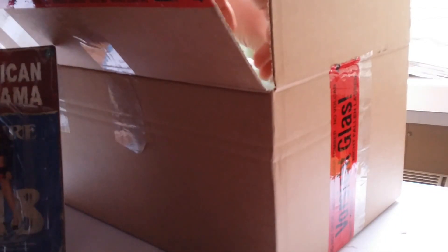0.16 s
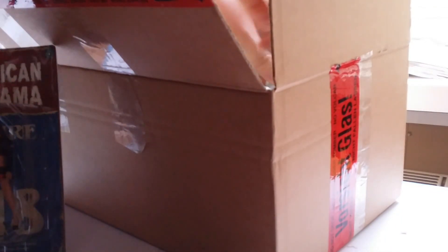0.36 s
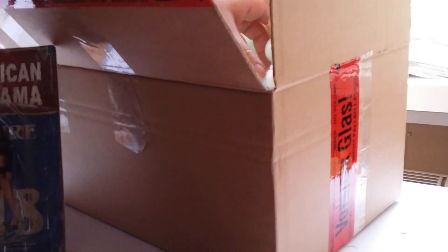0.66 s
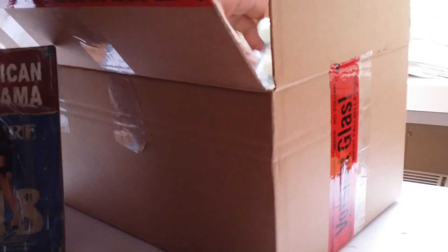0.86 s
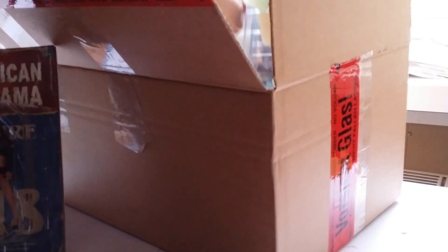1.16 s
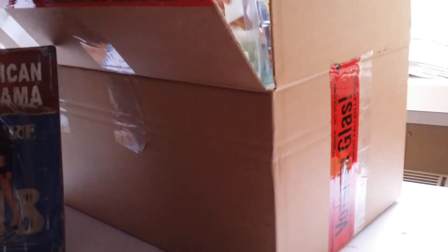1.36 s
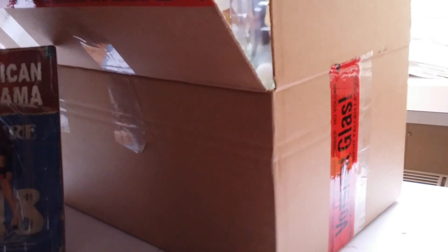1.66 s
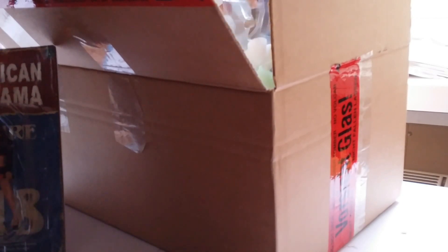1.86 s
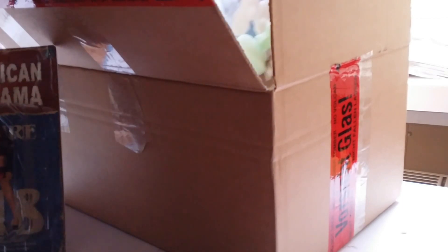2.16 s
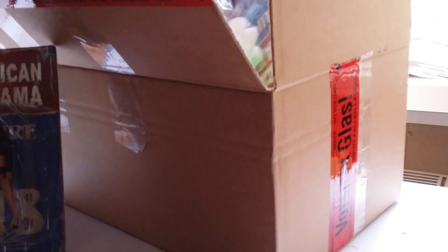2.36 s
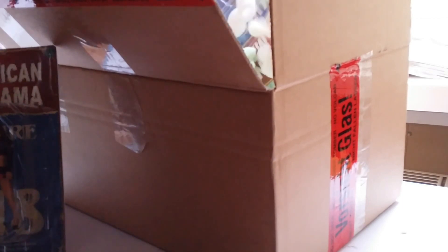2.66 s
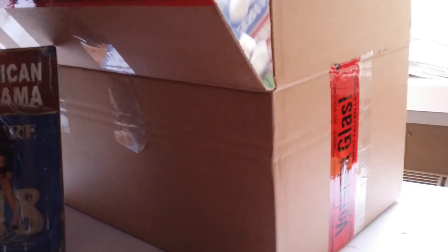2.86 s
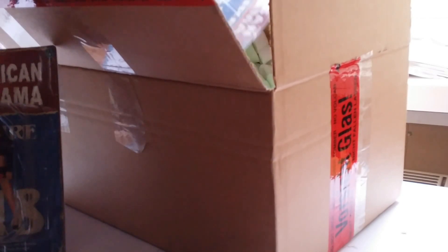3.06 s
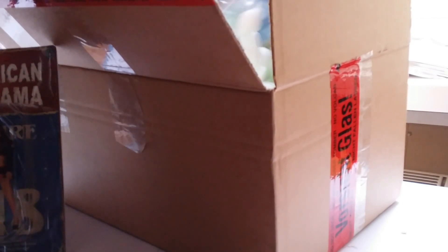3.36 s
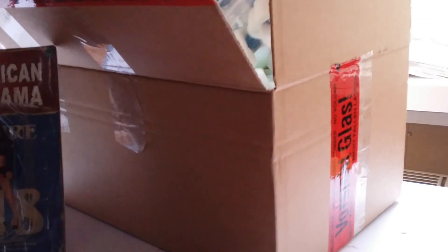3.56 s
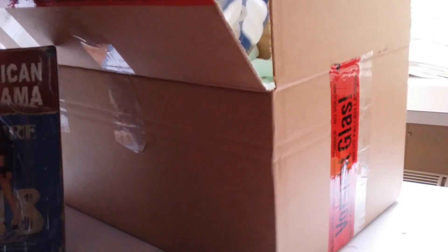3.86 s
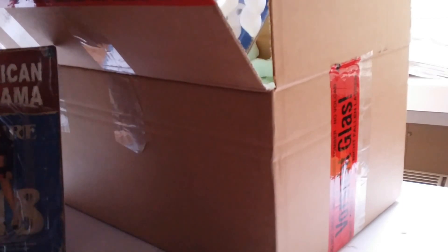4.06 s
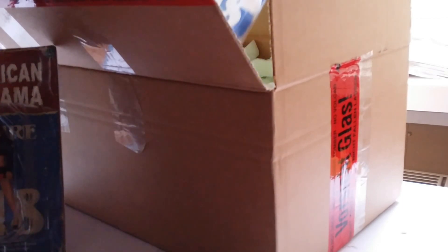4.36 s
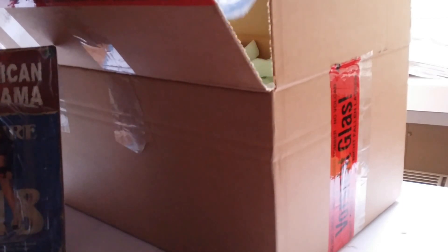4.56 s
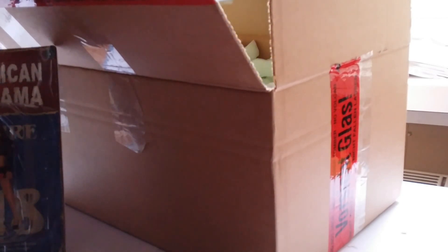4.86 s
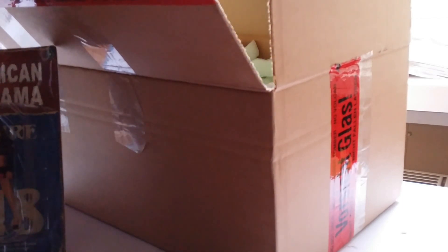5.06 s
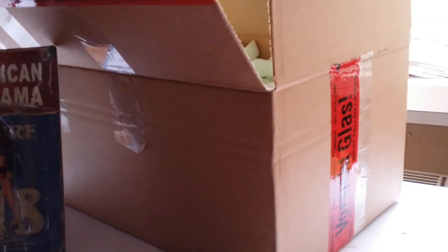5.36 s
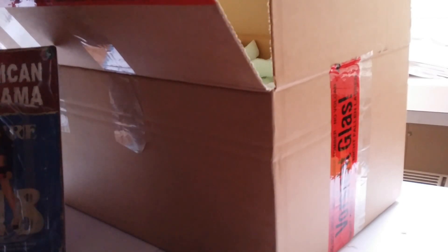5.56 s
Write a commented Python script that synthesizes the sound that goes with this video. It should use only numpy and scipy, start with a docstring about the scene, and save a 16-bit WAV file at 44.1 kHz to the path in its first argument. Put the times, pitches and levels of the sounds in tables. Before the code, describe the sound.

Light foam packing pieces slide and tumble in a cardboard box, in short irregular bursts. Bright granular rustling mixes with dull boxy bumps, little woody ticks and occasional crisp snaps. Activity is busiest in the first two seconds, continues in softer separate strokes, then fades to an almost silent lull with stray ticks. The sound finishes with a very short, loud plastic crinkle close to the microphone in the dry indoor space.

```python
"""A hand digs through foam packing peanuts in a cardboard box and draws out a plastic-wrapped object, in a small room.
From the start each stroke makes foam slide in dense tiny slips, heard as filtered random grains, while flicked
pieces ring as decaying sines. Pieces jostle, drop and knock, exciting the damped modes of the cardboard;
noise bursts give the few squeaks and the snaps of foam and wrapping. The digging then thins to a lull.
At the end the wrapping crinkles sharply close to the microphone: dense cracks and a few loud folds."""
import sys
import numpy as np
from scipy import signal
from scipy.fft import rfft, irfft
from scipy.io import wavfile
from scipy.ndimage import uniform_filter1d

SR = 44100
rng = np.random.default_rng(int(sys.argv[2]) if len(sys.argv) > 2 else 0)


def file_out(sig):
    """Save sig as 16-bit WAV at sys.argv[1]."""
    # one column per channel
    cols = np.atleast_2d(sig).T
    # limit, then scale
    lim = np.clip(cols, -1, 1)
    pcm = np.round(lim * 32767).astype(np.int16)
    wavfile.write(sys.argv[1], SR, pcm)


N = 252252
TIME = np.arange(N) / SR
HIT_TIME = np.arange(SR // 4) / SR

# All table levels are nominal: each source may trim them, and room and microphone ports follow.
# Strokes of the hand through the heap: (start [s], rise [s], hold [s], sliding level [dB],
# top treble setting relative to sliding [dB], jostling level [dB])
STROKES = [(0.01, 0.037, 0.0092, -52.5, -11, -55.5), (0.126, 0.027, 0.069, -51.5, -8, -54.5),
           (0.294, 0.072, .025, -47.5, -10, -50), (0.396, .04, 0.017, -44.5, -12, -43.5),
           (0.51, 0.054, 0.23, -52, -6.5, -52.5), (0.736, 0.035, 0.033, -49, -16, -48.5),
           (0.819, 0.14, 0.03, -36, -6.5, -46.5), (1.015, 0.057, .08, -43.5, -7.5, -51.5),
           (1.168, 0.035, 0.042, -47, -9, -49.5), (1.274, 0.032, 0.22, -53, -11, -55.5),
           (1.528, 0.066, 0.042, -51, -6.5, -53), (1.697, 0.042, 0.019, -59.5, -11, -56),
           (1.814, 0.023, 0.02, -55, -10, -47.5), (1.891, 0.027, 0.038, -48, -8.5, -52.5),
           (2.007, 0.018, 0.014, -57, -8, -56.5), (2.228, 0.026, 0.029, -57.5, -9.5, -61.5),
           (2.365, 0.019, .13, -51.5, -10.5, -54.5), (2.549, 0.019, 0.062, -54, -12.5, -57.5),
           (2.702, 0.037, 0.065, -61.5, -4.5, -59), (2.863, 0.018, .03, -57, -7.5, -59),
           (2.955, .04, 0.15, -61, -6.5, -56), (3.071, 0.024, 0.044, -57, -8.5, -52),
           (3.212, 0.031, 0.018, -65, -6, -72), (3.292, 0.022, .11, -46, -14.5, -50),
           (3.457, 0.034, 0.025, -51.5, -10.5, -49), (3.61, 0.041, 0.17, -62, -11, -63),
           (3.752, 0.055, 0.14, -52.5, -9, -57), (3.944, .02, 0.045, -59, -12, -69),
           (4.113, .1, 0.088, -63, -3, -71.5), (4.35, .03, 0.037, -73.5, -12, -69.5),
           (4.672, .02, .03, -75.5, -1, -71.5), (4.878, 0.021, 0.017, -72, -5, -79),
           (4.98, 0.018, .01, -78, 0, -85), (5.09, .015, .025, -67, -17, -64),
           (5.544, 0.042, 0.14, -66.5, -5.5, -69.5)]
# Faint creep of the disturbed heap: (time [s], sliding level [dB], jostling level [dB])
HEAP_CREEP = [(0, -68, -71.5), (3.6, -71.5, -68.5), (4.6, -76, -74), (5.1, -77, -71.5), (5.3, -80.5, -89)]
# Share of the box opening filled by the arm: (time [s], share [0-1])
ARM_SHARE = [(0.3, 0.1), (0.9, 0.6), (1.15, 0.72), (1.6, 0.06), (2.2, 0.46)]
# Spectrum of foam sliding on foam: (frequency [Hz], relative level [dB per Hz])
SLIDE_SPECTRUM = [(100, -38), (500, -3.5), (1000, -11), (1600, -11.5), (2200, -8.5), (3100, -1),
                  (4200, -4.5), (5600, -3), (7000, 1.5), (8500, -0.5), (10000, -10.5), (13000, -15),
                  (15500, -17.5)]
# Spectrum of jostling pieces: (frequency [Hz], relative level [dB per Hz])
JOSTLE_SPECTRUM = [(30, -31), (60, -10.5), (90, -2.5), (130, -4.5), (200, 1.5), (290, 3), (400, -3.5),
                   (560, -4.5), (800, -10), (1300, -14.5), (2500, -18), (6000, -64.5)]
# Blows on the cardboard: (time [s], level [dB], centre of the tone [Hz], crack level [dB])
KNOCKS = [(0.18, -44, 450, -65), (0.245, -49.5, 540, -68), (0.376, -41, 505, -44), (0.46, -31, 563, -55.5),
          (0.92, -44, 964, -62), (1.213, -46, 725, -58), (1.243, -43, 360, -51), (1.356, -40.5, 415, -44.5),
          (1.409, -50, 605, -81), (1.469, -44.5, 765, -46), (1.765, -52.5, 590, -60),
          (1.822, -49.5, 382, -68), (1.864, -49.5, 476, -49), (1.874, -48, 1010, -45.5),
          (2.395, -45, 324, -53.5), (2.503, -48, 610, -48.5), (2.573, -49.5, 616, -54.5),
          (2.649, -38, 544, -50.5), (2.657, -39.5, 806, -51), (2.703, -48.5, 493, -51.5),
          (2.788, -59, 584, -59), (2.968, -45.5, 402, -68), (2.998, -50, 276, -72),
          (3.116, -41, 530, -47.5), (3.416, -46, 306, -70), (3.474, -35, 490, -48), (3.481, -38, 460, -61),
          (3.741, -50, 443, -72), (3.774, -44.5, 570, -54.5), (3.798, -47.5, 380, -52.5),
          (3.992, -48, 360, -73), (4.234, -59, 527, -71), (4.435, -58, 355, -79), (4.699, -61, 690, -69),
          (5.098, -54, 940, -56.5)]
# Damped modes of the cardboard walls: (frequency [Hz], relative level [dB], t60 [s])
BOX_MODES = [(181, 3.5, 0.079), (278.4, -2.5, 0.13), (329, -2, 0.048), (408.5, 0, 0.074), (548, 1.5, 0.054),
             (658, -7, 0.008), (787, -6, 0.062), (1170, 0.5, 0.014), (1203, 3.5, 0.026), (1402, -5.5, 0.09),
             (1726, 5, 0.029), (2280, -11, 0.015)]
# Spectrum of the crack of crushed foam: (frequency [Hz], relative level [dB])
CRACK_SPECTRUM = [(300, -12), (900, 2), (1500, -4.5), (2700, 1), (4000, -5.5), (7000, -8), (10000, -12),
                  (15500, -25)]
# Shifts of the whole box: (time [s], level [dB], pitch [Hz], t60 [s])
THUMPS = [(0.983, -50, 85, 0.15), (1.874, -53.5, 101.4, 0.22), (2.747, -49.5, 80, 0.13),
          (3.099, -31.5, 198, 0.014), (3.102, -55, 89.5, 0.18), (3.479, -48, 91, 0.046)]
# Snaps of foam and wrapping: (time [s], level [dB], t60 [s])
SNAPS = [(0.049, -49, 0.027), (0.127, -52, 0.036), (0.216, -50, 0.03), (1.358, -53, 0.017),
         (1.627, -49, 0.038), (1.894, -39.5, 0.048), (1.9, -40.5, 0.072), (1.916, -54, 0.03),
         (2.032, -45.5, 0.05), (2.383, -63, 0.03), (2.618, -54, 0.03), (2.84, -49, 0.02),
         (2.88, -46.5, 0.033), (3.177, -51, 0.035), (3.307, -49, 0.024), (3.532, -50, 0.03),
         (3.746, -54.5, 0.03), (3.975, -45, 0.033), (4.031, -54, 0.03), (4.088, -61, 0.028),
         (4.437, -56, 0.026), (5.1, -52, 0.008)]
# Spectrum of a snap: (frequency [Hz], relative level [dB per Hz])
SNAP_SPECTRUM = [(200, -20), (1200, -10), (3000, -9), (5500, -4.5), (7800, 6), (10000, -7), (15500, -12.5)]
# Foam sticking and slipping: (time [s], length [s], pitch [Hz], bandwidth [Hz], level [dB])
SQUEAKS = [(0.433, 0.013, 3350, 200, -52), (0.969, 0.074, 2060, 150, -43), (1.108, 0.017, 2220, 350, -46),
           (1.893, 0.04, 7800, 800, -39), (1.897, 0.024, 5600, 600, -45.5)]
# Single peanuts that drop and tick: (time [s], pitch [Hz], level [dB])
DROPS = [(1.468, 884, -43.5), (1.562, 2140, -50), (2.503, 1375, -48.5), (2.658, 1390, -44),
         (2.702, 2700, -53), (3.194, 1290, -59), (3.739, 1340, -56), (3.773, 1840, -58), (4.411, 910, -63),
         (4.436, 640, -68), (4.699, 1700, -65), (4.848, 1420, -66), (5.057, 1300, -64), (5.112, 890, -59),
         (5.142, 710, -66)]
# Creasing of the wrapping near the microphone: (time [s], level [dB])
CREASE = [(5.678, -54), (5.682, -45), (5.698, -42), (5.702, -32.7), (5.72, -31.7)]
# Folds of the wrapping that flip over: (time [s], level [dB])
FOLDS = [(5.705, -24.5), (5.7078, -23.5), (5.7143, -31)]
# Spectrum of the wrapping: (frequency [Hz], relative level [dB per Hz])
WRAP_SPECTRUM = [(100, -28), (330, -7.5), (850, -23), (1450, -4.5), (2000, -7.5), (2400, -15), (3000, -2),
                 (4000, -8.5), (5400, -1), (7800, 4.5), (9300, -2), (11000, -3.5), (13400, 0), (15500, -6)]
# Spectrum of room rumble and microphone hiss: (frequency [Hz], relative level [dB per Hz])
HISS_SPECTRUM = [(25, -9), (55, -5), (100, -4.5), (160, -3), (230, -10), (330, -14), (440, -14.5),
                 (700, -29), (1100, -20), (2000, -28), (3600, -27.5), (5200, -21.5), (7400, -12),
                 (9800, -30.5), (15500, -30.5)]
# Gain of the side signal: (frequency [Hz], gain [dB])
SIDE_GAIN = [(40, -4), (130, -12.5), (270, -16.5), (520, -9), (1000, -5), (2000, -4), (4000, 0),
             (16000, 0.5)]
# Response of the left microphone port: (frequency [Hz], gain [dB])
LEFT_PORT = [(60, -1.9), (330, 2.1), (700, 0), (2500, 1), (4500, 1.2), (6600, 1), (7500, -1), (8600, -5),
             (10500, 1.3), (15000, 0)]
# Response of the right microphone port: (frequency [Hz], gain [dB])
RIGHT_PORT = [(60, 1), (330, 1.95), (700, 3), (2500, 1), (4500, 0.5), (6600, -5), (7500, -3), (8600, 0),
              (10500, 3), (15000, -1)]

# Growth of a stroke as it takes hold, and its steady fall once the hand stops
SWELL_DB, SLIDE_REST_DB_PER_S, JOSTLE_REST_DB_PER_S = 15.5, 131.5, 182
CREEP_TOP_DB = -9.5  # treble setting of the creep, relative to its sliding
REBOUND_S, REBOUND_DB = 0.009, -12.5


def undb(db):
    """Decibel law: level to amplitude ratio."""
    return 10 ** (np.asarray(db) / 20)


def curve(rows):
    """Linear interpolation in time of each column of a table."""
    times, *columns = np.transpose(rows)
    return [np.interp(TIME, times, column) for column in columns]


def fade(t60):
    """Exponential damping: amplitude falls by 60 dB in t60 seconds."""
    return np.exp(-np.log(1000) * HIT_TIME / max(t60, 1 / SR))


def colour(x, points, size=4096):
    """Minimum-phase filtering: a folded cepstrum turns (Hz, dB) points into a causal response."""
    hz, db = np.transpose(points)
    bin_hz = np.arange(size // 2 + 1) * SR / size
    gain_db = np.interp(np.log(bin_hz + 1), np.log(hz), db)
    cepstrum = irfft(np.log(undb(gain_db)))[:size // 2]
    cepstrum[1:] *= 2
    response = irfft(np.exp(rfft(cepstrum, size)))[:size // 2]
    if x.ndim > 1:
        response = response[None]
    return signal.oaconvolve(x, response, axes=-1)[..., :x.shape[-1]]


def band(x, lo_hz, hi_hz, order=2):
    """Band-pass resonance with a Butterworth response."""
    edges = [lo_hz, min(hi_hz, SR / 2 - 1)]
    return signal.sosfilt(signal.butter(order, edges, "band", fs=SR, output="sos"), x)


def unit(pair, lo_hz, hi_hz):
    """Rms normalisation of a mid/side pair by one band of its mid."""
    return pair / band(pair[0], lo_hz, hi_hz, order=4).std()


def add(track, s, hit, db, size=176):
    """Superposition of a mid/side hit, its loudest 4 ms of mid scaled to the given rms level."""
    start = int(np.clip(s * SR, 0, N - 1))
    loudest = np.sqrt(uniform_filter1d(hit[0] ** 2, size).max())
    hit = hit * undb(db) / loudest
    track[:, start:start + hit.shape[1]] += hit[:, :N - start]


def walk(rate):
    """Random modulation: independent levels, rate per second, joined by lines; spread near 1."""
    levels = rng.standard_normal(N // 20)
    return np.sqrt(1.5) * np.interp(TIME * rate, np.arange(len(levels)), levels)


def grains(rate, scatter_db):
    """Shot noise: random contacts of uneven size, each from its own place in the box (mid, side)."""
    happens = rng.random(N) < rate / SR
    sizes = undb(scatter_db * rng.standard_normal(N))
    return happens * sizes * rng.standard_normal((2, N)) / np.sqrt(rate)


def motion():
    """Incoherent addition: powers of the creep and of every stroke sum to sliding, treble, jostling dB."""
    creep_slide_db, creep_jostle_db = curve(HEAP_CREEP)
    slide = undb(creep_slide_db) ** 2
    jostle = undb(creep_jostle_db) ** 2
    top = slide * undb(CREEP_TOP_DB) ** 2
    for start, rise, hold, slide_db, top_db, jostle_db in STROKES:
        swell_db = SWELL_DB * np.minimum((TIME - start) / rise - 1, 0)
        swell = (TIME > start) * undb(swell_db)
        resting = np.maximum(TIME - start - rise - hold, 0)
        rub = swell * undb(slide_db - SLIDE_REST_DB_PER_S * resting)
        tumble = swell * undb(jostle_db - JOSTLE_REST_DB_PER_S * resting)
        slide = slide + rub ** 2
        top = top + (rub * undb(top_db)) ** 2
        jostle = jostle + tumble ** 2
    return 10 * np.log10([slide, top / slide, jostle])


def sliding(slide_db, top_db):
    """Stick-slip friction of foam on foam: faster motion gives more slips, in bunches of level."""
    slips_per_s = 7000 * undb(0.5 * (slide_db + 50.5)) + 4000
    slips = grains(slips_per_s, scatter_db=1) * undb(walk(220))
    rub = unit(colour(slips, SLIDE_SPECTRUM), 2500, 10000)
    # the faces in contact keep changing, and with them the tone
    for hz in (1200, 1800, 2700, 4000, 6000, 9000, 12500):
        flicker = undb(1.13 * walk(35)) - 1
        rub = rub + flicker * band(rub, hz / 1.5, hz * 1.24, order=1)
    # sharper edges add top treble; a setting of -13 dB leaves it unchanged
    top = signal.sosfiltfilt(signal.butter(2, 10000, "high", fs=SR, output="sos"), rub)
    top_gain = undb(1.1 * (np.clip(top_db, -20, 0) + 13))
    return (rub + (top_gain - 1) * top) * undb(slide_db - 1.0)


def pieces(slide_db, count=2200, lo_hz=550, hi_hz=9000, cycles=46, scatter_db=3.0):
    """Impulse-excited resonance: each flicked peanut rings at its own pitch, losing 60 dB in 46 cycles."""
    out = np.zeros((2, N))
    t = HIT_TIME[:SR // 20]
    draws = zip(rng.random((count, 2)), rng.standard_normal((count, 2)))
    for (when, size), (loud, place) in draws:
        start = int(when * (N - len(t)))
        hz = lo_hz * (hi_hz / lo_hz) ** size
        ring = np.sin(2 * np.pi * hz * t) * np.exp(-np.log(1000) * hz * t / cycles)
        # small pieces ring higher and shorter, and snap harder
        gain = undb(slide_db[start] + scatter_db * loud) * (hz / hi_hz) ** 0.68
        out[:, start:start + len(t)] += gain * np.outer([1, place], ring)
    return out * undb(1.5)


def shaded(pair, dip_hz=3200, dip_width_hz=750):
    """Two-path interference: with the arm in the opening, one band cancels in proportion to its share."""
    share, = curve(ARM_SHARE)
    dip = band(pair, dip_hz - dip_width_hz / 2, dip_hz + dip_width_hz / 2, order=1)
    return pair - np.clip(share, 0, 1) * dip


def jostling(jostle_db, scatter_db=2.0):
    """Random impacts of light pieces on each other and the walls, coloured by the hollow box."""
    bumps = colour(grains(np.full(N, 1800.0), scatter_db), JOSTLE_SPECTRUM)
    return unit(bumps, 150, 900) * undb(jostle_db - 1.22)


def blows():
    """Inelastic rebound: every knock returns once, softer."""
    hits = []
    for s, db, hz, crack_db in KNOCKS:
        hits.append((s, db, hz, crack_db))
        hits.append((s + REBOUND_S, db + REBOUND_DB, hz, crack_db + REBOUND_DB))
    return hits


def knocks(crush_db=-1, crush_t60=0.013, spot_db=3, spot_t60=0.027, crack_t60=0.067,
           build_s=0.0011, below=0.55, above=1.86):
    """Modal excitation: a blow rings the walls and the struck spot while foam crushes with a dry crack."""
    out = np.zeros((2, N))
    hz, db, t60 = np.transpose(BOX_MODES)
    decays = undb(db)[:, None] * np.array([fade(t) for t in t60])
    give = 1 - fade(build_s)  # soft foam takes a moment to press home
    for s, level_db, tone_hz, crack_db in blows():
        # the load on the walls shifts their pitch, and the struck spot sets the phase of each mode
        pitch = hz * (1 + 0.048 * rng.standard_normal(len(hz)))
        turns = pitch[:, None] * HIT_TIME + rng.random((2, len(hz), 1))
        ring = np.sum(decays * np.sin(2 * np.pi * turns), axis=1)
        spot = undb(spot_db) * fade(spot_t60) * np.sin(2 * np.pi * tone_hz * HIT_TIME)
        crush, crack = rng.standard_normal((2, 2, len(HIT_TIME)))
        crush = undb(crush_db) * fade(crush_t60) * crush
        body = give * (ring + np.outer([1, -0.5], spot) + crush)
        add(out, s, band(body, below * tone_hz, above * tone_hz), level_db + 0.5)
        add(out, s, colour(give * fade(crack_t60) * crack, CRACK_SPECTRUM), crack_db - 0.1)
    return out


def thumps():
    """Flexural vibration: a push bends a whole panel, which swings as a damped sine."""
    out = np.zeros((2, N))
    for s, db, hz, t60 in THUMPS:
        swing = np.sin(2 * np.pi * hz * HIT_TIME) * fade(t60) * (1 - fade(0.012))
        add(out, s, np.array([swing, -swing / 2]), db)
    return out


def snaps(edge_db=1):
    """Sudden release of strain: edges let go with a short bright crack of decaying noise."""
    out = np.zeros((2, N))
    for s, db, t60 in SNAPS:
        burst = fade(t60) * rng.standard_normal((2, len(HIT_TIME)))
        add(out, s, colour(burst, SNAP_SPECTRUM), db + edge_db)
    return out


def squeaks():
    """Stick-slip oscillation: a stuck piece shudders as narrow-band noise of unsteady pitch."""
    out = np.zeros((2, N))
    for s, length, hz, width, db in SQUEAKS:
        grip = (1 - fade(0.008)) * np.exp(-(HIT_TIME / length) ** 4)
        shudder = band(rng.standard_normal((2, len(HIT_TIME))), hz - width / 2, hz + width / 2)
        add(out, s, grip * shudder, db)
    return out


def drops(t60=0.018, spread=1.05):
    """Damped contact: a falling peanut lands with a short, woody tick around its own pitch."""
    out = np.zeros((2, N))
    for s, hz, db in DROPS:
        contact = fade(t60) * rng.standard_normal((2, len(HIT_TIME)))
        add(out, s, band(contact, hz / spread, hz * spread, order=1), db)
    return out


def crinkle(fold_s=0.0016):
    """Buckling of thin plastic: creases give a run of tiny cracks, and a few folds flip over loudly."""
    crease_db, = curve(CREASE)
    cracks = colour(grains(np.full(N, 25000.0), scatter_db=0.5), WRAP_SPECTRUM)
    started = TIME > CREASE[0][0]
    out = cracks / cracks[0].std() * undb(crease_db + 1.0) * started
    flip = np.sin(np.pi * np.minimum(HIT_TIME / fold_s, 1))
    for s, db in FOLDS:
        burst = flip * rng.choice([-1, 1], (2, len(HIT_TIME)))
        add(out, s, colour(burst, WRAP_SPECTRUM), db)
    return out


def room(pair, t60=0.2, wet_db=-9):
    """Reverberation: convolving the mid with decaying noise gives reflections from flaps and room."""
    tail = rng.standard_normal((2, len(HIT_TIME))) * fade(t60) * (1 - fade(0.0091))
    tail = tail / np.sqrt(np.sum(tail[0] ** 2))
    tail = colour(tail, [(80, -2), (250, -2.5), (2000, -1.0), (7000, -5.5), (15000, -0.5)])
    return pair + undb(wet_db) * signal.oaconvolve(pair[:1], tail, axes=1)[:, :N]


def hiss(level_db=-68.5):
    """Stationary random noise: quiet room rumble and microphone hiss."""
    noise = colour(rng.standard_normal((2, N)), HISS_SPECTRUM)
    return noise / noise[0].std() * undb(level_db)


def scene():
    """Superposition of all sources as mid and side, decoded to left and right."""
    slide_db, top_db, jostle_db = motion()
    rubbing = sliding(slide_db, top_db) + pieces(slide_db)
    heap = shaded(rubbing) + jostling(jostle_db)
    box = heap + knocks() + thumps() + snaps() + squeaks() + drops()
    mid, side = room(box + crinkle()) + hiss()
    side = colour(side, SIDE_GAIN)
    return np.array([mid + side, mid - side])


def record(dry, bass_hz=40, top_hz=15750):
    """Linear filtering: each port has its own response; deep bass rolls off and the top is cut steeply."""
    ported = np.array([colour(dry[0], LEFT_PORT), colour(dry[1], RIGHT_PORT)])
    ported = signal.sosfilt(signal.butter(2, bass_hz, "high", fs=SR, output="sos"), ported)
    return signal.sosfilt(signal.ellip(10, 0.2, 70, top_hz, fs=SR, output="sos"), ported)


dry = scene()
out = record(dry)
file_out(out)
```